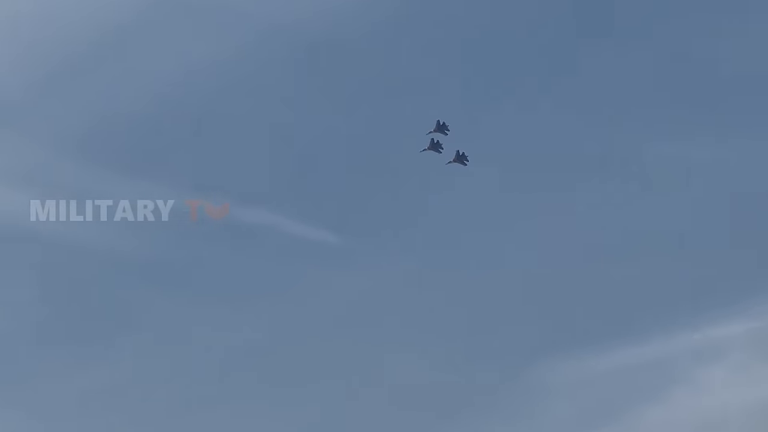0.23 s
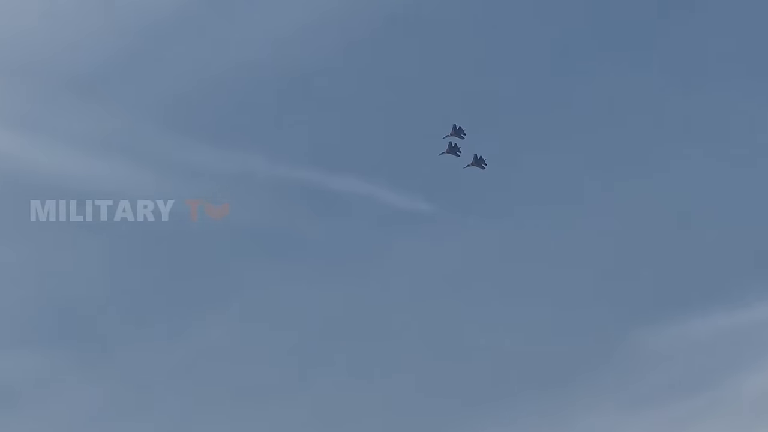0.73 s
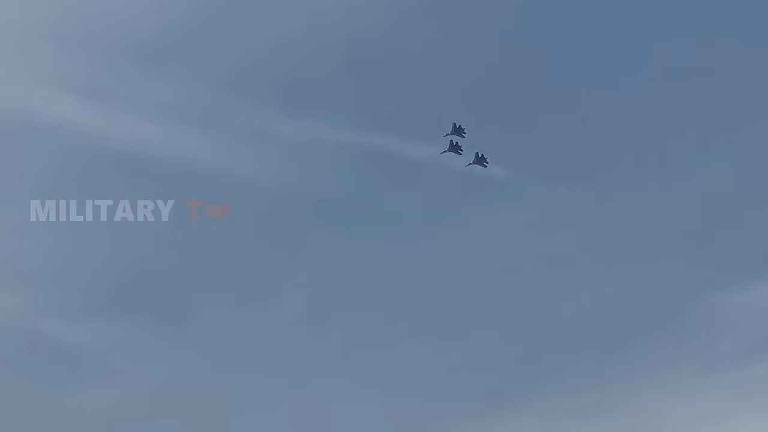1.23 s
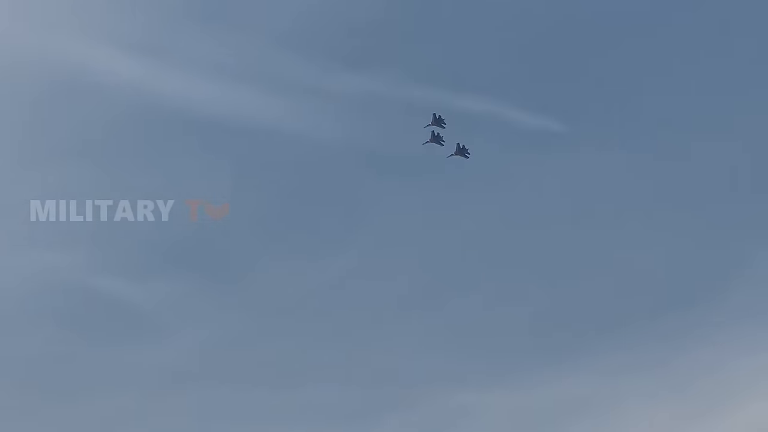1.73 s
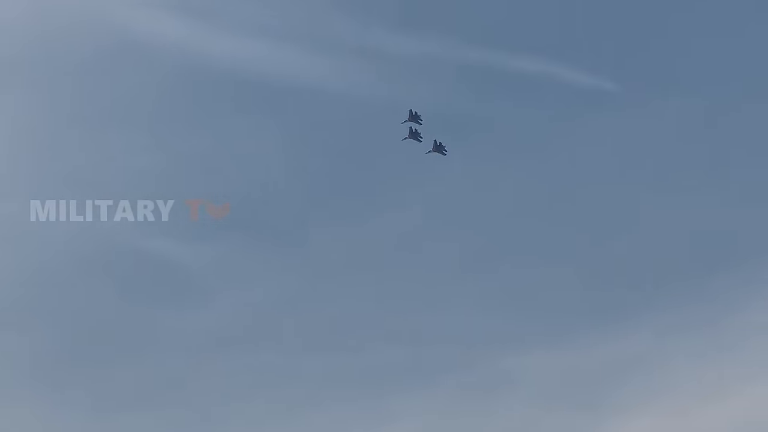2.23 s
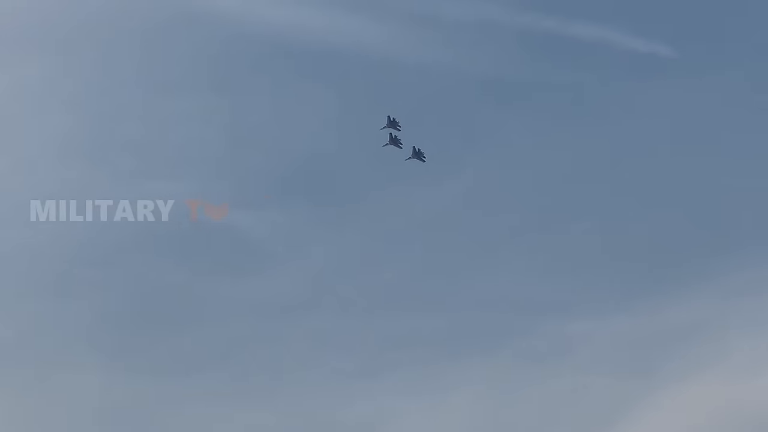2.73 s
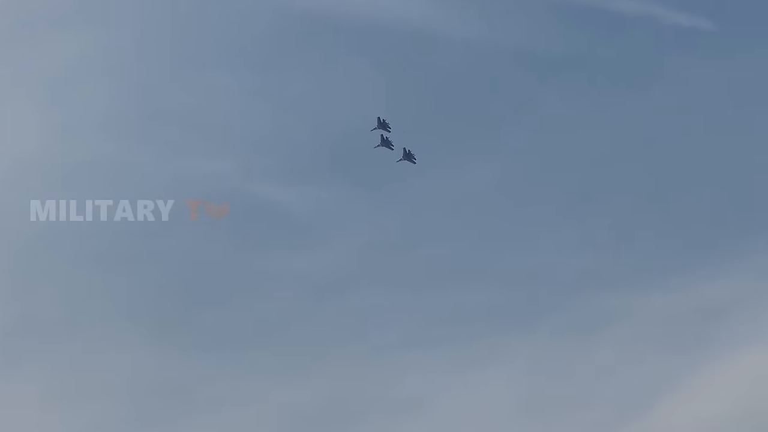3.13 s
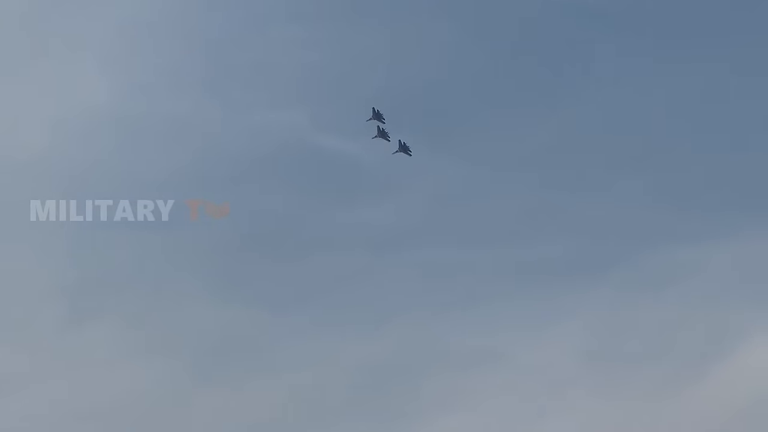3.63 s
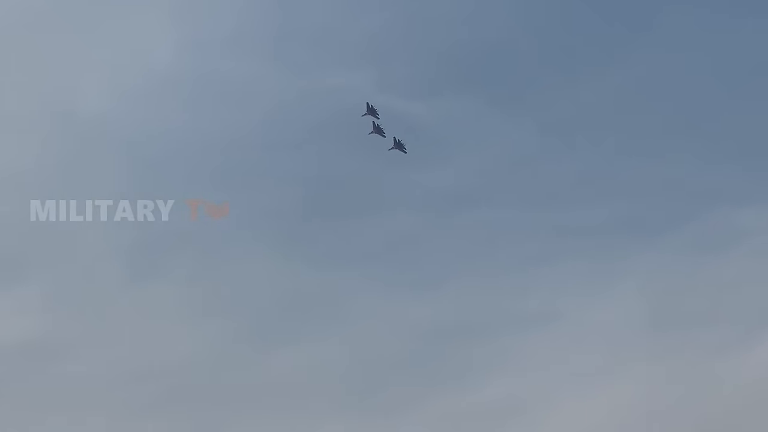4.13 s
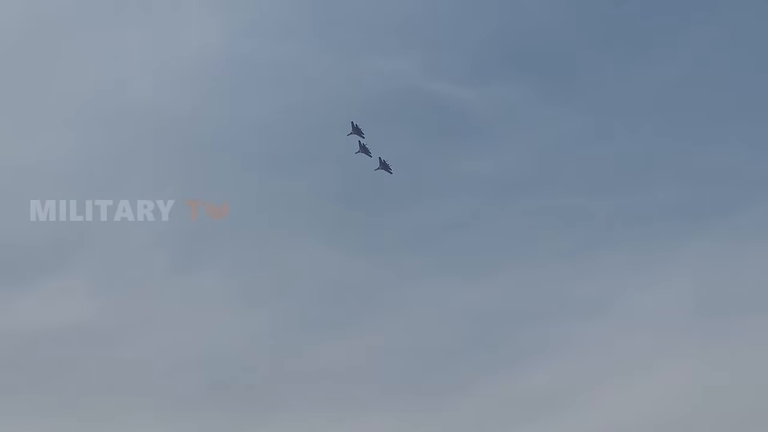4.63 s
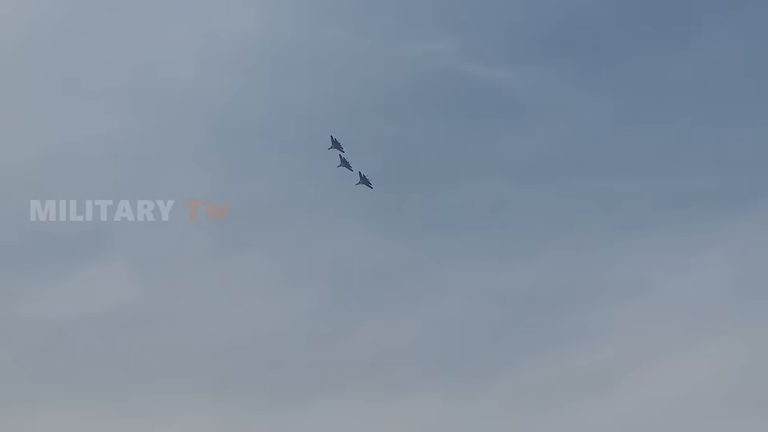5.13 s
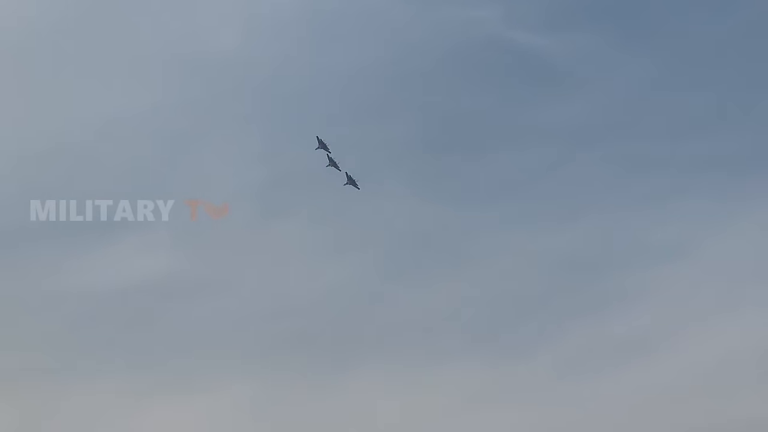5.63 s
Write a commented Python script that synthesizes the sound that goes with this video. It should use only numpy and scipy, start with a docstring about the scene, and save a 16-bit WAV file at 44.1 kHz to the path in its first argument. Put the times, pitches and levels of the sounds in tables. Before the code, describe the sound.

Three fighter jets roar away high overhead, a deep hollow rumble with rough crackling surges that fades, leaving low airfield hum and faint turbine whine.

```python
"""Receding jets over an airfield

Three jet aircraft recede high overhead; one shared roar arrives directly and, as a comb filter, off the
ground, with surges and dull cracks. Nearer by, a small gas turbine gives shaped noise (hiss, blade-tone
haystack) and sines at shaft orders. Bass noise is the airfield's rumble; sines are machinery hum and a drone.
"""
import sys
import numpy as np
from scipy import signal
from scipy.io import wavfile
from scipy.ndimage import uniform_filter1d

SR = 44100
rng = np.random.default_rng(int(sys.argv[2]) if len(sys.argv) > 2 else 0)


def voltage_ratio(decibels):
    """Convert decibels (scalar or array-like) to amplitude ratios, 20 dB per decade."""
    exponent = np.asarray(decibels, float) / 20
    return 10 ** exponent


def int16_out(signal):
    """Quantize to a 16-bit WAV file."""
    q = np.round(np.clip(np.atleast_2d(signal).T, -1, 1) * 32767)
    wavfile.write(sys.argv[1], SR, q.astype(np.int16))


N = 259308  # samples
FRAME, HOP = 2048, 512  # short-time frame and hop, samples
T = np.arange(N // HOP + 5) * HOP / SR  # frame times, s
HZ = np.fft.rfftfreq(FRAME, 1 / SR)[:, None]  # bin frequencies, Hz

# response difference of the two microphone ports: f/Hz, left minus right/dB
PORT_TILT = [(60, -0.5), (250, .5), (580, -0.5), (1400, -1), (2250, -5), (3500, 0), (5500, 0)]
# coherence between the ports for the airfield side: f/Hz, likeness/1
FIELD_COHERENCE = [(60, 1), (120, 1), (250, 0.71), (510, 0.63), (1030, 1), (1660, 0.44), (2200, 0.7),
                   (2900, 0.71), (5000, 0.92), (6000, 1), (7300, 1), (7800, 0.92), (8400, 0.82),
                   (9300, 0.74), (10250, 0.94)]
# phase lead of the left port for the airfield side: f/Hz, lead/rad
FIELD_PHASE = [(0, 0), (90, .15), (190, .45), (550, .9), (1200, 1.8), (2070, 6.5), (2500, 7), (5200, 6.3),
               (8600, 6.3), (9300, 7.8), (10250, 9.42), (11000, 11.4), (11600, 12.55)]


def evened(x):
    """Normalization to unit root mean square."""
    return x / np.sqrt(np.mean(x ** 2) + 1e-20)


def read(points, hz):
    """Linear interpolation of a table on a logarithmic frequency axis."""
    f, value = np.transpose(points)
    return np.interp(np.log(hz + 1), np.log(f + 1), value)


def columns(rows, t):
    """Linear interpolation in time of every value column of a table."""
    s, *values = np.transpose(rows)
    return [np.interp(t, s, v) for v in values]


def waver(t, slow_hz, fast_hz):
    """Slow fluctuation of rms 1: superposed sines of random phase, power falling as 1/f."""
    rates = np.geomspace(slow_hz, fast_hz, num=16)
    return evened(sum(np.sin(2 * np.pi * (f * t + rng.random())) / np.sqrt(f) for f in rates))


def patches(size):
    """Scintillation by turbulent air: random blotches, smoothed over size = (bins, frames), rms 1."""
    field = rng.standard_normal((len(T), len(HZ))).T
    over_frequency = uniform_filter1d(field, size[0], axis=0)
    return evened(uniform_filter1d(over_frequency, size[1], axis=1))


def swell(t, peak_s, length, rise):
    """Asymmetric Gaussian envelope of height 1 whose rise takes a share of its fall length."""
    return np.exp(-((t - peak_s) / np.where(t < peak_s, rise * length, length)) ** 2)


def unit(gain, low_hz, high_hz):
    """Band normalization: by Parseval's theorem the noise between the edges gets rms 1."""
    band = (HZ >= low_hz) & (HZ <= high_hz)
    return gain / np.sqrt((band * gain ** 2).sum(0) * 2 / 3)  # 2/3: overlapped Hann frames


def noise(gain, same, lead):
    """Partly coherent noise at two ports: inverse short-time transform of random complex spectra."""
    a, b, c, d = rng.standard_normal((len(T), len(HZ), 4)).T
    alike = np.clip(read(same, HZ), -1, 1)
    left = a + 1j * b
    independent = c + 1j * d
    right = alike * left + np.sqrt(1 - alike ** 2) * independent
    right = right * np.exp(-1j * read(lead, HZ))
    tilt = voltage_ratio(read(PORT_TILT, HZ) / 2)
    spectra = gain * np.array([left * tilt, right / tilt])
    return signal.istft(spectra, nperseg=FRAME, noverlap=FRAME - HOP)[1][:, :N]


def tone(hz, db):
    """Sinusoid from the airfield side: interport phase and level differences place it."""
    turn = 2 * np.pi * (np.cumsum(hz * np.ones(N)) / SR + rng.random())
    tilt = voltage_ratio(read(PORT_TILT, hz) / 2)
    left = tilt * np.sin(turn)
    right = np.sin(turn - read(FIELD_PHASE, hz)) / tilt
    return np.sqrt(2) * voltage_ratio(db) * np.array([left, right])  # sqrt 2: db is an rms level


def roar(t):
    """Jet level/dB and brightness/(dB/octave): slow retreat plus surges carried in by moving air."""
    # the retreat: t/s, level/dB, brightness/(dB/octave)
    retreat = [(0, -27, -1), (.6, -30.5, -1.5), (1.5, -30.5, -2.5), (2.1, -34, -1.5), (2.4, -37, 1.5),
               (2.8, -35, 1), (3.15, -36.5, 2.5), (3.4, -41, 4.5), (4.1, -42, 2), (4.9, -42, 0),
               (5.88, -41, 1.5)]
    # the surges: peak t/s, level rise/dB, fall length/s, brightening/(dB/octave)
    surges = [(0.144, 4.5, 0.02, -1), (0.321, 3.5, 0.03, -2), (0.44, 0.5, 0.04, 2.5), (0.8, 3.5, 0.065, -3),
              (1.07, 5.5, 0.091, 1.5), (1.144, 1, 0.06, 1.5), (1.191, 2.5, 0.044, 2.5),
              (1.256, 6.5, 0.14, 3.5), (1.335, 1.5, 0.05, 2), (1.385, 1.5, 0.084, 1),
              (1.53, 0.5, 0.055, 2.5), (1.479, 5, 0.056, 0), (1.605, 2.5, 0.083, 3.5),
              (1.805, 2.5, 0.081, -1.5), (2.12, 1, 0.05, 0.5), (2.383, 1.5, 0.12, 0), (2.612, 1, 0.05, 3.5),
              (2.74, 0, 0.065, -0.5), (2.897, 0.5, 0.11, 1.5), (3.055, -0.5, 0.072, 0.5),
              (3.17, 0.5, 0.081, -0.5), (4.21, 3.5, 0.064, 0.5), (4.294, 4.5, 0.09, 4.5),
              (4.58, 3, 0.2, 1.5), (5.75, 3.5, 0.11, 0.5)]
    level_db, bright_db = columns(retreat, t)
    for s, rise_db, length, brighter_db in surges:
        shape = swell(t, s, length, rise=0.28)
        level_db = level_db + rise_db * shape
        bright_db = bright_db + brighter_db * shape
    return level_db, bright_db


def ground(t):
    """Reflection: echo delay/ms, shortening as the jets sink to the horizon, and strength (0-1)."""
    # reflection strength: t/s, strength/1
    echo_strength = [(0, 0.97), (.45, 0.93), (.8, 1), (1.1, 1), (1.6, 0.92), (2.2, 0.7), (2.55, 0.85),
                     (2.9, 1), (3.25, 0.9), (3.6, 0.35), (4.4, 0.45), (5.88, 0.29)]
    start_ms, ms_per_s = 4.474, -0.158
    return start_ms + ms_per_s * t, np.clip(columns(echo_strength, t)[0], 0, 1)


def jets(blur_hz=2000, clearer_db=0.9, knee_hz=1500, patchy_db=0.73):
    """Comb-filtered jet noise: direct and ground-reflected roar interfere, upper teeth blurred."""
    # exhaust noise after a long path through air, before tilt and comb: f/Hz, relative level per Hz/dB
    roar_spectrum = [(30, -27), (70, -6), (120, 3.5), (165, 7), (220, 10.5), (280, 6.5), (450, 0.5),
                     (700, -7), (1000, -13), (1400, -20), (2000, -27), (2600, -44), (3300, -53),
                     (5000, -72), (9000, -110)]
    # coherence between the ports: f/Hz, likeness/1
    jet_coherence = [(60, 1), (250, 0.99), (510, 0.97), (1030, 0.94), (2110, 0.74), (4290, 0.95)]
    # phase lead of the left port: f/Hz, lead/rad
    jet_phase = [(0, 0), (800, -.1), (1400, -.7), (2500, .4), (3400, .7), (5200, 0)]
    bright_db = roar(T)[1]
    delay_ms, echo = ground(T)
    # three sources and moving air disagree; the brighter the roar, the higher the teeth stay clear
    clear_hz = blur_hz * voltage_ratio(clearer_db * bright_db)
    clarity = np.exp(-(HZ / clear_hz) ** 2)
    comb = 1 + echo ** 2 + 2 * echo * clarity * np.cos(2 * np.pi * HZ * delay_ms / 1000)  # power
    octaves = np.log2((HZ + 30) / 500 / np.sqrt(1 + (HZ / knee_hz) ** 2))  # levels off above the knee
    colour = voltage_ratio(read(roar_spectrum, HZ) + bright_db * octaves) * np.sqrt(comb)
    gain = unit(colour, 330, 1300) * voltage_ratio(patchy_db * patches(size=(12, 5)))
    level_db = roar(np.arange(N) / SR)[0]
    return noise(gain, jet_coherence, jet_phase) * voltage_ratio(level_db)


def cracks(low_hz=450, high_hz=1400, air_hz=2700, per_s=200, crackle_db=3, spread_db=3, echo=0.8):
    """Nonlinear steepening: strong fronts over a fine crackle that follows the roar, dulled by air."""
    # strong shock fronts before filtering: t/s, impulse level/dB
    strong_fronts = [(0.145, 0), (.165, -16), (.318, 0), (.33, -5), (.385, -6), (0.441, -2.5), (0.761, -8),
                     (0.789, -4), (0.819, -1), (0.951, -3), (1.069, -9), (1.187, -5), (1.195, 2),
                     (1.201, -6), (1.222, -9), (1.228, 10), (1.241, -1), (1.25, -9), (1.26, 2), (1.278, 3),
                     (1.313, 0), (1.33, -3), (1.352, -17), (1.386, 0), (1.576, -4), (1.741, -11),
                     (2.886, -17), (3.059, -12), (3.964, -16), (4.258, -12)]
    t = np.arange(N) / SR
    level_db, bright_db = roar(t)
    struck = rng.random(N) < per_s / SR
    size = np.minimum(rng.exponential(1, N), 3)
    fronts = struck * voltage_ratio(level_db + 0.5 * bright_db + crackle_db + spread_db * size)
    for s, db in strong_fronts:
        fronts[round(s * SR)] += voltage_ratio(db)
    # delaying the running sum lets an echo fall between samples
    late = np.interp(t - ground(t)[0] / 1000, t, np.cumsum(fronts), left=0)
    fronts = fronts + echo * np.diff(late, prepend=0)
    body_filter = signal.butter(2, [low_hz, high_hz], "bandpass", fs=SR, output="sos")
    air_filter = signal.butter(5, air_hz, fs=SR, output="sos")
    return signal.sosfilt(air_filter, signal.sosfilt(body_filter, fronts))


def turbine(patchy_db=1.0, flutter_db=1.0):
    """Rotor noise: broadband hiss, a haystack about the blade tone, and thin shaft-order lines."""
    # hiss spectrum: f/Hz, relative level per Hz/dB
    hiss_spectrum = [(700, -2), (1300, 1), (2100, -1), (2900, -12), (3700, -11.5), (5200, -17.5),
                     (6300, -17.5), (7800, -18), (8600, -23.5), (9300, -27), (10200, -32), (11200, -32.5),
                     (12500, -40)]
    # haystack peaks: centre f/Hz, width/Hz, relative level/dB
    haystack_peaks = [(7060, 160, -1), (7230, 530, 0.5)]
    # shaft orders: multiple of the shaft rate/1, level against the whine reference/dB
    shaft_orders = [(2, 15), (3, 9.5), (4.672, 4.5), (6, -1.5), (20, -8)]
    # swells and dips of the whine: peak t/s, rise/dB, fall length/s
    whine_swells = [(0.596, -5, 0.28), (1.191, -0.5, 0.17), (2.298, 1.5, .2), (3.048, 2, 0.14),
                    (3.6, -4.5, 0.31), (4.102, 1, 0.42), (4.834, -6, .06), (4.997, 1.5, 0.17)]
    shaft_hz = 354.85
    hiss_start_db, hiss_from_s, hiss_db_per_s = -62, 2.84, 1.5
    whine_start_db, whine_db_per_s, shaft_db_per_s = -69, 1.67, 0.5

    hiss_db = hiss_start_db + hiss_db_per_s * np.maximum(T - hiss_from_s, 0)
    hiss = unit(voltage_ratio(read(hiss_spectrum, HZ)), 2900, 6200)
    hiss = hiss * voltage_ratio(hiss_db + patchy_db * patches(size=(32, 4)))

    whine_db = whine_start_db + whine_db_per_s * T
    whine_db = whine_db + sum(db * swell(T, s, length, 0.88) for s, db, length in whine_swells)
    stack_power = sum(voltage_ratio(db) ** 2 / width / (1 + (2 * (HZ - hz) / width) ** 2) ** 2
                      for hz, width, db in haystack_peaks)
    stack = unit(np.sqrt(stack_power), 6100, 7500)
    stack = stack * voltage_ratio(whine_db - 1.0 + flutter_db * waver(T, 2.2, 30))

    t = np.arange(N) / SR
    shaft_db = whine_start_db + shaft_db_per_s * T
    lines = 0
    for k, db in shaft_orders:
        course_db = whine_db if k > 10 else shaft_db  # only high orders follow the whine's swells
        line_db = db + np.interp(t, T, course_db + 2.3 * waver(T, 0.68, 18))
        lines = lines + tone(k * shaft_hz, line_db)
    return noise(np.hypot(hiss, stack), FIELD_COHERENCE, FIELD_PHASE) + lines


def airfield(patchy_db=1.83):
    """Superposition of low-frequency noise, growing and wavering hum lines, and a swelling drone."""
    # steady rumble: f/Hz, relative level per Hz/dB
    rumble_spectrum = [(15, -57.5), (30, -24.5), (50, -3), (110, 5), (160, -1), (300, -9.5), (550, -12.5),
                       (900, -22.5), (1500, -28), (2500, -53.5), (5000, -89)]
    # machinery hum: f/Hz, starting level/dB, waver (rms, either sign)/dB
    hum_lines = [(39.6, -54, 0.5), (50.7, -51.5, 2.5), (83.84, -38.5, 2.5), (90.23, -37, 1.5),
                 (182.2, -49, -2), (192.1, -43, 1), (399.5, -52, -0.5), (566, -64, -4.5)]
    # course of the drone: t/s, level/dB
    drone_course = [(0, -28), (.6, -38), (.9, -39), (2.6, -44.5), (3.0, -36.5), (3.8, -35), (4.6, -35),
                    (5.88, -37.5)]
    rumble_db, hum_db_per_s, drone_hz = -32.5, 0.77, 62.97
    t = np.arange(N) / SR
    rumble = unit(voltage_ratio(read(rumble_spectrum, HZ)), 0, SR)
    rumble = rumble * voltage_ratio(rumble_db + patchy_db * patches(size=(12, 10)))
    hum = 0
    for hz, db, depth_db in hum_lines:
        waver_db = np.interp(t, T, depth_db * waver(T, 0.186, 4.1))
        hum = hum + tone(hz, db + hum_db_per_s * t + waver_db)
    drone = tone(drone_hz, *columns(drone_course, t))
    return noise(rumble, FIELD_COHERENCE, FIELD_PHASE) + hum + drone


def scene():
    """Linear superposition of all sources at the two ports."""
    return jets() + cracks() + turbine() + airfield()


def top_cut(x):
    """Nothing passes above the cut-off."""
    return signal.sosfilt(signal.butter(12, 12600, fs=SR, output="sos"), x)


def record(dry):
    """High-pass response of the microphone, then linear fades that keep the ends free of clicks."""
    edge_s = 0.003
    bass_cut = signal.butter(3, 33, "highpass", fs=SR, output="sos")
    heard = signal.sosfilt(bass_cut, dry)
    t = np.arange(N) / SR
    heard = heard * np.clip(np.minimum(t, t[::-1]) / edge_s, 0, 1)
    return top_cut(heard)


dry = scene()
out = record(dry)
int16_out(out)
```